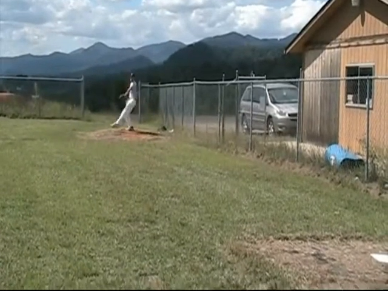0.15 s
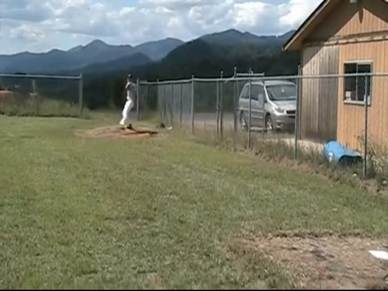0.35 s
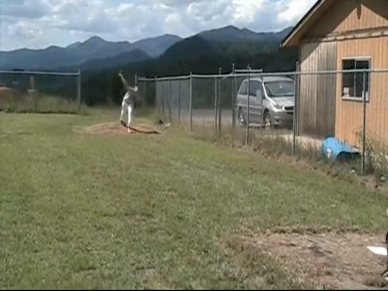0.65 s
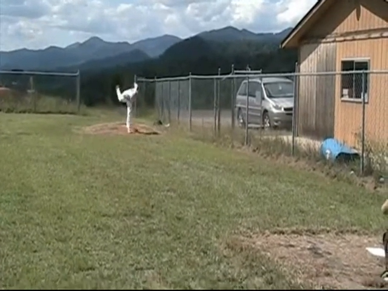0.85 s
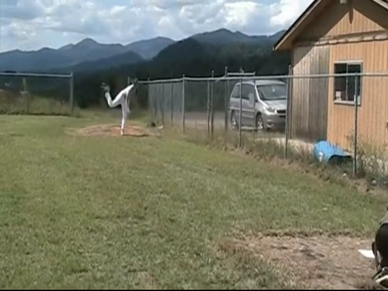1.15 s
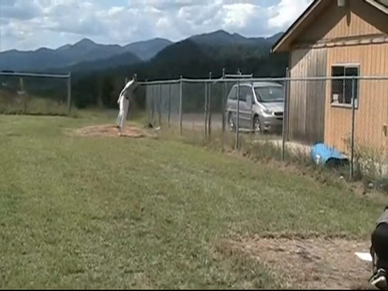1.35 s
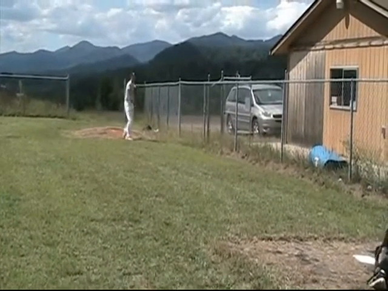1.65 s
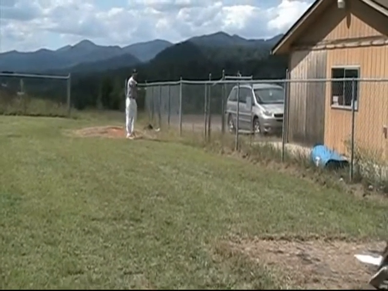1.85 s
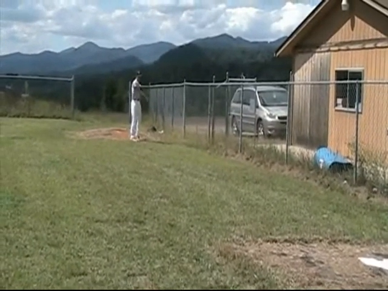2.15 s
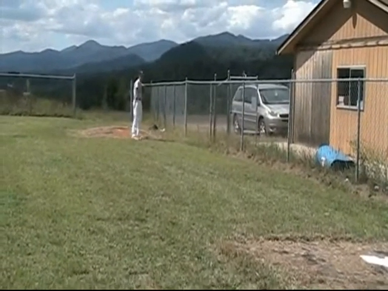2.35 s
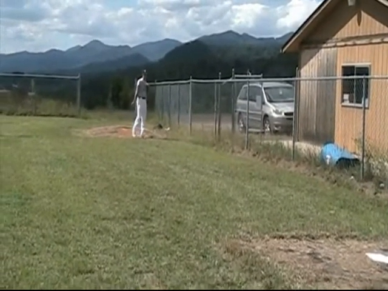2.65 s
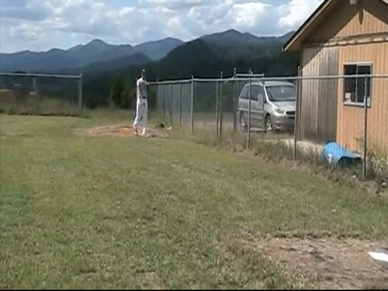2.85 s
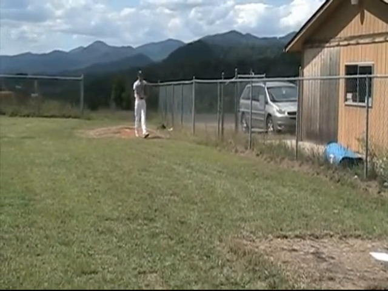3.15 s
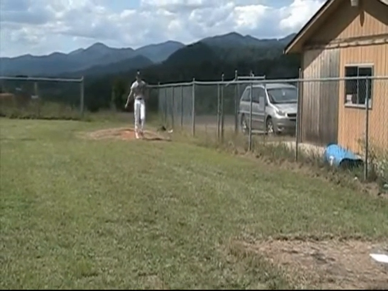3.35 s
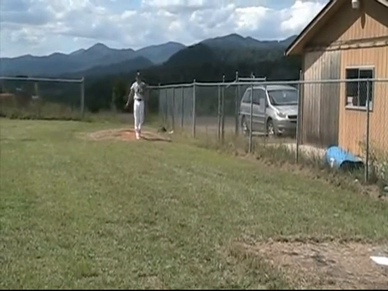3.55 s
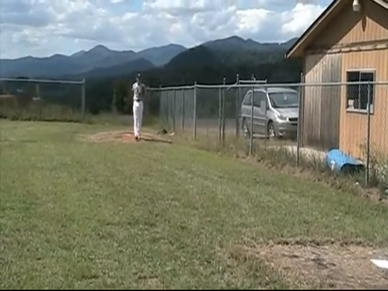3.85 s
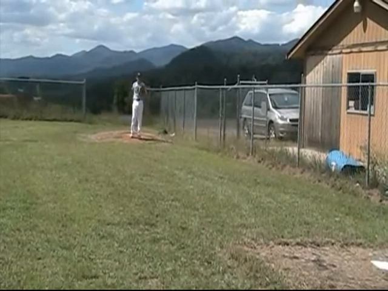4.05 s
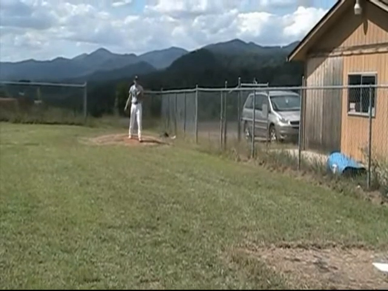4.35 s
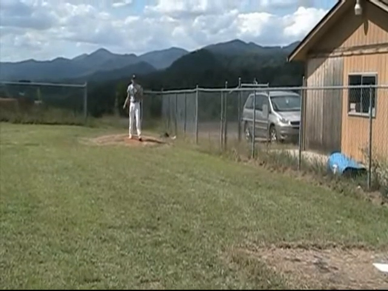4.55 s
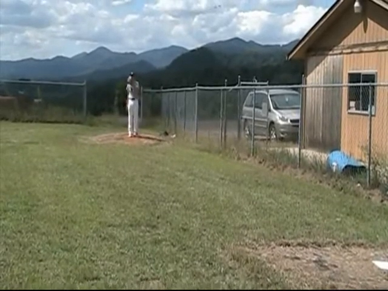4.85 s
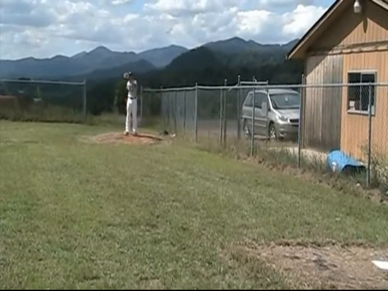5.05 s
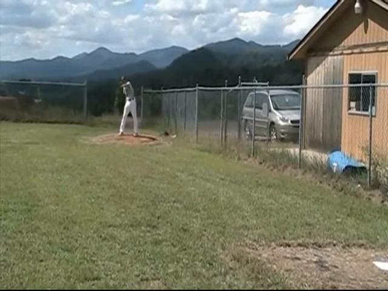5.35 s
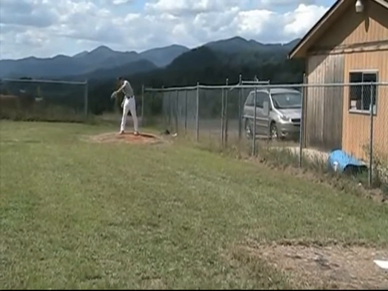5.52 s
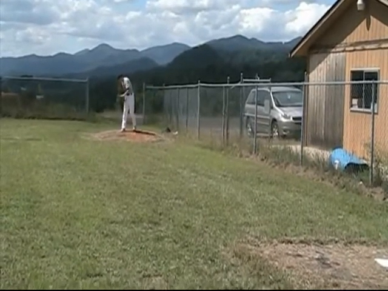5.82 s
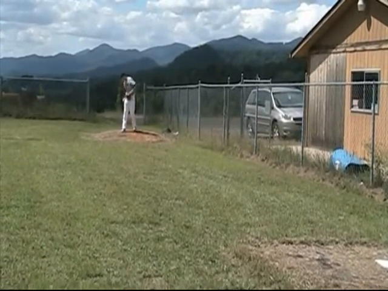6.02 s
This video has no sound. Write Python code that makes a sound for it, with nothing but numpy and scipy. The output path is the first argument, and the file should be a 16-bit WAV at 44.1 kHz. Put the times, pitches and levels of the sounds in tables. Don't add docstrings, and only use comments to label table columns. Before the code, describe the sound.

Over a steady low engine hum and faint crickets, a pitch cracks into a mitt; later a return throw smacks a far glove amid wind.

```python
import sys
import numpy as np
from scipy import signal
from scipy.fft import rfft, irfft, next_fast_len
from scipy.io import wavfile
from scipy.ndimage import uniform_filter1d, map_coordinates

SR = 44100
rng = np.random.default_rng(int(sys.argv[2]) if len(sys.argv) > 2 else 0)


def level_to_linear(level):
    exponent = np.asarray(level, float) / 20
    return 10 ** exponent


def master(y):
    cut = np.clip(np.atleast_2d(y).T, -1, 1)
    pcm = np.round(cut * 32767)
    wavfile.write(sys.argv[1], SR, pcm.astype(np.int16))


N = 272755


def along(points, hz):
    f, v = np.transpose(points)
    return np.interp(np.log(hz + 1), np.log(f + 1), v)


def curves(rows):
    s, *cols = np.transpose(rows)
    return [np.interp(np.arange(N) / SR, s, c) for c in cols]


def unit(x):
    return x / np.sqrt(np.mean(x ** 2) + 1e-20)


def wobble(rate):
    knots = rng.standard_normal(int(N / SR * 40) + 4)
    return map_coordinates(knots, [np.arange(N) * min(rate, 39) / SR])


def filtered(x, response):
    m = next_fast_len(x.shape[-1] + 8192)
    spectrum = rfft(x, m) * response(np.fft.rfftfreq(m, 1 / SR))
    return irfft(spectrum, m)[..., :x.shape[-1]]


def body(modes, sign=-1):
    def response(f):
        total = 0
        for k, (centre, width, db) in enumerate(modes):
            loss = 1j * f * width
            total = total + sign ** k * level_to_linear(db) * loss / (centre * centre - f * f + loss)
        return total
    return response


def swells(rows):
    t = np.arange(N) / SR
    return sum(peak * np.exp(-((t - s) / np.where(t < s, rise, fall)) ** 2) for s, peak, rise, fall in rows)


def loud_swells(rows):
    return swells([(s, level_to_linear(db), rise, fall) for s, db, rise, fall in rows])


def rush(spectrum, patchy_db):
    # (frequency [Hz], correlation [-1 to 1])
    alike = [(60, 0.97), (110, 0.54), (200, 1), (370, 0.07), (680, 0.8), (1250, 0.81), (2290, 0.77),
             (4200, 0.59), (7700, 0.28), (14100, 0.2)]
    z = signal.stft(rng.standard_normal((2, N + 512)), nperseg=512)[2]
    patches = uniform_filter1d(rng.standard_normal(z.shape[1:]), size=6, axis=0)
    patches = uniform_filter1d(patches, size=10, axis=1)
    pair = signal.istft(z * level_to_linear(patchy_db * unit(patches)), nperseg=512)[1][:, :N]

    def colour(hz):
        angle = np.arccos(np.clip(along(alike, hz), -1, 1)) / 2
        return level_to_linear(along([(10, -120), *spectrum, (16000, -120)], hz)) * [np.cos(angle), np.sin(angle)]

    mid, side = filtered(pair, colour)
    return unit(np.array([mid + side, mid - side]))


def two_paths():
    # (time [s], share of the second path [0-1])
    fades = [(1.55, 0), (2.1, 0.13), (2.62, 0.38), (3.13, 0.13), (3.57, 0.23), (4.088, 0.71), (4.638, 0.43),
             (5.248, 0.79), (5.96, 0.1), (6.6, 0)]
    s, share = np.transpose(fades)
    slip, share = curves(np.transpose([s, np.arange(len(s)), np.clip(share, 0, 1)]))
    return np.abs(1 - share * np.exp(2j * np.pi * slip))


def engine():
    # (time [s], speed [turns/s])
    speed = [(0, 34.7), (.85, 36.15), (2, 37.2), (3.6, 38.35), (4.8, 39.05), (5.5, 39.25), (5.9, 39.25)]
    # (time [s], speed [turns/s])
    lift_off = [(5.981, 39), (6.042, 35), (6.1, 27.53), (6.18, 24.4)]
    # (time [s], level [dB])
    drone = [(0, -32), (.36, -26), (1.2, -25.5), (1.7, -27), (2.1, -23.5), (2.4, -27.5), (2.8, -30),
             (3.4, -29), (3.85, -25.5), (4.97, -20.5), (5.45, -22.5), (6.02, -25), (6.08, -34), (6.18, -33)]
    # (multiple of shaft rate, level [dB])
    shaft = [(2, -44), (3, -39), (5, -47), (6, -52), (8, -58), (9, -57), (13, -60)]
    # (time [s], peak [dB], rise [s], fall [s])
    seventh = [(2.9, -46, .5, .5), (3.55, -46, .4, .15), (4.12, -45, .12, .4), (4.7, -46, .3, .18)]
    # (frequency [Hz], density [dB per Hz])
    rumble = [(25, -2.5), (60, -3), (120, 5.5), (200, 3), (300, -10.5), (400, -42)]
    tone_jitter = .18

    turns = 2 * np.pi * np.cumsum(curves(speed + lift_off)[0]) / SR
    level = level_to_linear(curves(drone)[0] + 3.5 + 0.63 * wobble(15)) * two_paths()
    tone = level * np.sin(4 * turns + tone_jitter * wobble(21))
    weak = np.zeros(N)
    for k, db in shaft:
        weak += level_to_linear(db + 3 * wobble(3)) * np.sin(round(k) * turns + .5 * wobble(3))
    weak += (level_to_linear(-58) + loud_swells(seventh)) * np.sin(7 * turns + .3 * wobble(3))
    return tone + weak + level_to_linear(-38.5) * rush(rumble, patchy_db=-0.7)


def field():
    # (time [s], level [dB])
    road = [(0, -46.5), (.4, -47.5), (.7, -45), (1.3, -45.5), (2.9, -48), (4.03, -46), (5.1, -47.5),
            (6.18, -47.5)]
    # (frequency [Hz], density [dB per Hz])
    traffic_colour = [(180, -8.5), (300, -1), (406, -5), (438, -5), (473, -9), (510, -8), (1040, -8),
                      (1350, -14.5), (1790, -15.5), (4000, -32), (5200, -66), (8800, -120)]
    # (frequency [Hz], density [dB per Hz])
    hiss_colour = [(1500, -19), (3000, -10), (4600, -3.5), (5700, -9), (7200, -4.5), (8300, 0.5),
                   (9500, -7.5), (11000, -18.5), (13500, -19.5)]
    hiss_db = -59.5

    traffic = level_to_linear(curves(road)[0] + 3.5 + 0.85 * wobble(9)) * rush(traffic_colour, patchy_db=1.0)
    hiss_level = level_to_linear(hiss_db + 2.0 + 0.65 * wobble(11.0) + 0.73 * wobble(1.5))
    return traffic + hiss_level * rush(hiss_colour, patchy_db=1.0)


def wind():
    # (frequency [Hz], density [dB per Hz])
    buffet = [(12, -43.5), (20, -5), (56, -6), (92, -4), (163, -4.5), (269, -12.5), (334, -18),
              (500, -27.5), (650, -66.5), (1100, -120)]
    # (time [s], buffet level [dB])
    gusts = [(.55, -40), (0.882, -35.5), (1.12, -43.5), (1.28, -30), (1.62, -29.5), (2.03, -27.5),
             (2.32, -38), (2.62, -37.5), (3.25, -56), (3.5, -42.5), (4.25, -43), (4.5, -41.5),
             (4.77, -39.5), (4.999, -45), (5.25, -42.5), (5.6, -27), (5.87, -35.5), (6.14, -33)]
    # (time [s], peak [dB], frequency [Hz], left over right [dB])
    bumps = [(1.228, -20, 120, -4), (1.618, -21, 130, -13), (2.046, -17, 100, 6), (2.096, -18, 121, 5),
             (2.551, -14, 140, -4), (3.32, -19, 130, 5), (4.21, -20, 110, 15), (4.694, -15.5, 110, 8),
             (4.742, -12, 100, -0.5), (5.725, -12.5, 99, 3.5),
             (6.1503, -3.5, 150, -2.5),
    ]
    calm_db, gust_rise_s, gust_fall_s = -49.5, .1, 0.15
    lump_db = 3.3
    eddy_lag_s = .0003

    lumps = level_to_linear(lump_db * np.array([wobble(13), wobble(14)]))
    noise = filtered(rng.standard_normal((2, N)), lambda hz: level_to_linear(along(buffet, hz)))
    own, push = unit(lumps * noise)
    gust_swells = loud_swells([(s, db, gust_rise_s, gust_fall_s) for s, db in gusts])
    gust = level_to_linear(3.0) * (level_to_linear(calm_db) + gust_swells)

    t = np.arange(N) / SR + np.array([[0], [eddy_lag_s]])
    eddies = np.zeros((2, N))
    for s, db, hz, pan_db in bumps:
        peak = level_to_linear(db + np.array([[pan_db / 2], [-pan_db / 2]]))
        eddies -= peak * np.cos(2 * np.pi * hz * (t - s)) * np.exp(-(1.73 * hz * (t - s)) ** 2)
    return gust * (push * [[1.2], [-.6]] + own * [[.3], [.6]]) + eddies * [[1], [-1]]


def cricket(strokes, at, top_hz, drop_hz, share, lag):
    s, done = np.transpose(strokes)
    t = np.arange(N) / SR
    first_rate = (done[1] - done[0]) / (s[1] - s[0])
    outside = np.minimum(t - s[0], 0) + np.maximum(t - s[-1], 0)
    count = np.interp(t, s, done) + first_rate * outside
    stroke = ((count - at) % 1 - .5 * (1 - share)) / share
    stroke = np.clip(stroke, 0, 1)
    swell = np.sin(np.pi * stroke) ** 0.49 * level_to_linear(1.5 * wobble(26))
    pitch_hz = top_hz - drop_hz * stroke ** 3 + 30 * wobble(12)
    phase = 2 * np.pi * np.cumsum(pitch_hz) / SR
    return unit(swell * np.sin(phase + [[-lag / 2], [lag / 2]]))


def crickets():
    # (time [s], wing strokes so far)
    high_trill = [(0.1, 2.17), (6.1, 113.23)]
    # (time [s], wing strokes so far)
    mid_trill = [(0.1, 1.34), (1.15, 20.2), (1.55, 27.74), (4.6, 82.13), (5.7, 101.5), (6.2, 110.1)]
    # (time [s], stroke pairs so far)
    low_trill = [(0.1, 2.27), (1.8, 44.72), (3.1, 77.75), (4, 101.12), (5.1, 128.87), (6.2, 156.2)]
    # (time [s], peak [dB], rise [s], fall [s])
    low_song = [(0, -55, .1, .35), (1.2, -55, 0.27, 0.43), (1.95, -61, .3, 0.085), (2.8, -58, 0.64, 0.99),
                (3.9, -54.5, 0.16, 0.25), (4.4, -60.5, 0.15, .25), (4.9, -67, .15, 0.11),
                (5.2, -65.5, 0.18, 0.21), (5.95, -55.5, 0.16, 0.48)]

    high = level_to_linear([[-59], [-57.5]]) * cricket(high_trill, .5, 8790, 520, share=.33, lag=1.48)
    mid = level_to_linear([[-60], [-62]]) * cricket(mid_trill, 0.61, 8450, 550, share=0.29, lag=1.86)
    pair = cricket(low_trill, .52, 7400, 350, share=0.08, lag=-0.56)
    pair = pair + cricket(low_trill, .91, 7280, 310, share=0.17, lag=-0.57)
    return high + mid + level_to_linear(-9.0) * (level_to_linear(-69.5) + loud_swells(low_song)) * pair


def scuffs():
    # (time [s], level [dB], length [s], centre [Hz])
    scrapes = [(0.846, -42.5, .018, 2170), (1.585, -60, 0.01, 4000), (1.963, -46, 0.0035, 3040),
               (2.015, -46, 0.015, 3840), (2.325, -50.5, 0.016, 5100), (2.872, -54, 0.063, 5950),
               (3.349, -55, 0.07, 4040), (3.905, -57.5, 0.019, 7983), (4.467, -55.5, 0.031, 5070),
               (4.971, -59, 0.014, 4970), (5.863, -56, 0.041, 3960)]
    # (distance from centre [octaves], level [dB])
    grit_colour = [(-6.5, -6.5), (-0.5, -0.5), (-0.5, 0), (1.2, -11), (1.5, -31.5)]

    out, t = np.zeros((2, N + SR)), np.arange(-4096, 4096) / SR
    for s, db, length, hz in scrapes:
        grit = rng.standard_normal(len(t)) + 1.1 * rng.standard_normal((2, len(t)))
        grit = filtered(grit, lambda f: level_to_linear(np.interp(np.log2((f + 1) / hz), *np.transpose(grit_colour))))
        start = round(s * SR) - len(t) // 2
        out[:, start:][:, :len(t)] += level_to_linear(db) * np.exp(-(t / length) ** 2) * unit(grit)
    return out[:, :N]


def catch(blows, leather, grip_s):
    # (frequency [Hz], density [dB per Hz])
    crack = [(1500, -33.5), (3500, 5.5), (4300, -15), (5300, -2.5), (6500, -11.5), (7800, -4),
             (9000, -23.5), (12500, -27), (15000, -49.5)]
    snap_spread = .35

    force, snap, t = np.zeros(N), np.zeros((2, N)), np.arange(512) / SR
    for s, db, contact_ms, crack_db in blows:
        start = round(s * SR)
        push = np.sin(np.pi * np.clip(1000 * t / contact_ms, 0, 1)) ** 2
        force[start:][:len(t)] += level_to_linear(db) * push / push.sum()
        noise = rng.standard_normal(len(t)) + snap_spread * rng.standard_normal((2, len(t)))
        noise = unit(filtered(noise, lambda f: level_to_linear(along(crack, f))))
        decay = level_to_linear(crack_db - 60 * t / 0.011) * (1 - np.exp(-t / 0.00026))
        snap[:, start:][:, :len(t)] += decay * noise
    grip = .15 + .85 / (1 + np.exp(np.clip((np.arange(N) / SR - grip_s) / .0004, -50, 50)))

    def pocket(f):
        dipole = 1j * f / (1000 + 1j * f * 0.78)
        padding = 1 / (1 - (f / 3500) ** 2 + .6j * f / 3500)
        return body(leather, sign=1)(f) * dipole * padding

    return filtered(force, pocket) * grip + snap


def pitch_pop():
    # (time [s], level [dB], contact [ms], crack [dB])
    blows = [
        (1.2752, 23.5, 0.4, -21),
        (1.2767, 21.5, 0.6, -12),
        (1.27775, 27.5, 0.46, -16),
    ]
    # (frequency [Hz], width [Hz], level [dB])
    mitt = [(361, 56, 13), (676, 44, 14), (1215, 110, -2.5), (2050, 180, -10), (3100, 1600, -7)]
    return catch(blows, mitt, 1.2824) * level_to_linear([[-.6], [.6]])


def echoes():
    # (time [s], level [dB], tilt [dB per octave], t60 [s])
    slaps = [(1.2976, -11, 1, 0.006), (1.3021, -13, 3, 0.0062), (1.3127, -12, -4, 0.0066),
             (1.3285, -12, 1, 0.009), (1.334, -16, 4, 0.0076),
             (1.29, -29, 0, 0.0098), (1.317, -27, 0, .006), (5.599, -24, -4, 0.014),
                   (5.607, -11, -17, .01), (5.639, -43, 7, 0.0045), (5.658, -32, -21, 0.011)]
    # (time [s], peak [dB], rise [s], fall [s])
    scatter = [(1.281, -34, .002, 0.027), (1.333, -30, 0.0062, 0.046), (1.7, -54.5, 0.25, 0.066),
               (5.596, -35.5, 0.0038, 0.02), (5.64, -53, 0.022, 0.11)]
    # (frequency [Hz], width [Hz], level [dB])
    fence = [(1355, 120, 0.5), (2170, 186, 3.5), (3090, 320, -1.5), (5000, 1200, -9), (7740, 1500, -11.5),
             (9430, 1300, -19.5)]
    post_s, post_gap_s = 1.3455, .0064
    post_db, post_arc_db = -25, -0.2
    post_tilt_db, post_t60 = -1.5, 0.0077

    out, t = np.zeros((2, N)), np.arange(2048) / SR
    posts = []
    for k in range(7):
        posts.append((post_s + k * post_gap_s, post_db - post_arc_db * (k - 3) ** 2, post_tilt_db, post_t60))
    for s, db, tilt_db, t60 in slaps + posts:
        puff = rng.standard_normal(len(t)) + 0.51 * rng.standard_normal((2, len(t)))
        tilt = lambda f: level_to_linear(tilt_db * np.log2(np.clip(f, 700, 9000) / 2500))
        puff = unit(filtered(puff, lambda f: body(fence)(f) * tilt(f)))
        decay = level_to_linear(db - 60 * t / t60) * (1 - np.exp(-t / .0004))
        out[:, round(s * SR):][:, :len(t)] += decay * puff
    grit = level_to_linear(4.4 * uniform_filter1d(rng.standard_normal(N), size=60) * np.sqrt(60))
    smear = grit * (rng.standard_normal(N) + 0.47 * rng.standard_normal((2, N)))
    return out + loud_swells(scatter) * unit(filtered(smear, body(fence)))


def chinks():
    # (time [s], level [dB], length [s], frequency [Hz])
    rings = [(1.687, -51.5, 0.034, 2930), (3.292, -61, 0.032, 4400), (3.819, -44.5, .004, 1830),
             (4.347, -62, 0.043, 4500), (4.895, -50.5, 0.0044, 3020)]
    t, out = np.arange(N) / SR, 0
    for s, db, length, hz in rings:
        ring = unit(filtered(rng.standard_normal(N), lambda f: np.exp(-((f - hz) / 220) ** 2)))
        out = out + level_to_linear(db) * np.exp(-((t - s) / length) ** 2) * ring
    return out


def return_throw():
    # (time [s], level [dB], contact [ms], crack [dB])
    blows = [
        (5.5926, 22.5, 0.49, -19.5),
        (5.5934, 4, 0.42, -25),
        (5.606, 21.5, 0.43, -25),
        (5.6068, -10, 0.81, -24),
    ]
    # (frequency [Hz], width [Hz], level [dB])
    glove = [(271, 360, 4.5), (677, 126, 5), (862, 133, 5), (1430, 130, -33), (2460, 810, -13),
             (3300, 2200, -2.5)]
    return catch(blows, glove, 5.612)


def over_turf(balls):
    # frequency [Hz], width [Hz], depth [0-1]
    ground = (3630, 220, 0.61)
    hz, width, depth = ground
    return filtered(balls, lambda f: 1 - min(depth, 1) * body([(hz, width, 0)])(f))


def scene():
    # (time [s], depth [0-1], fall [s], recovery [s])
    duck = [
        (1.275, 0.6, 0.0067, 0.054),
    ]
    balls = over_turf(pitch_pop() + return_throw() + echoes() * level_to_linear([[-.4], [.4]]))
    drone = engine() * (1 - swells(duck))
    return balls + drone + field() + wind() + crickets() + scuffs() + chinks()


def roll_off(x):
    return signal.sosfilt(signal.butter(12, 14730, fs=SR, output="sos"), x)


def record(dry):
    top_hz, port_top = 13850, 1.1
    heard = filtered(dry, lambda f: 1 / (1 + (f / top_hz) ** 40))
    clipped = heard / (1 + np.abs(heard / port_top) ** 8) ** (1 / 8)
    return roll_off(clipped)


dry = scene()
out = record(dry)
master(out)
```